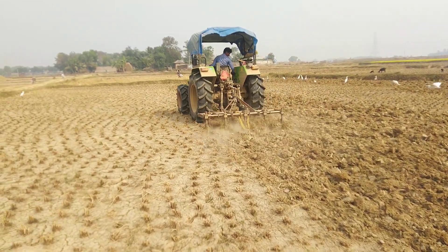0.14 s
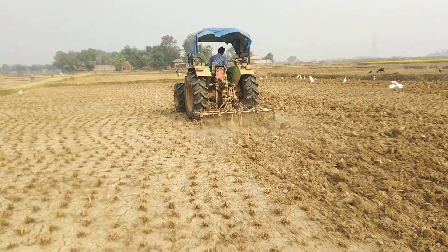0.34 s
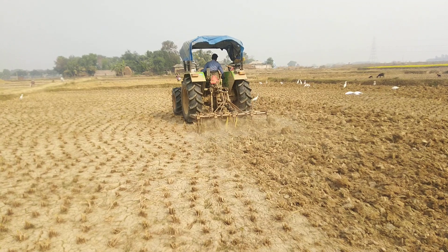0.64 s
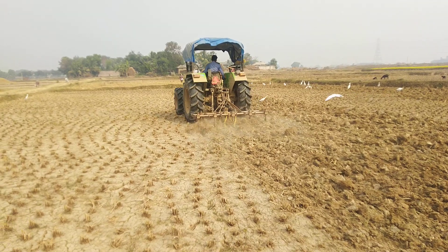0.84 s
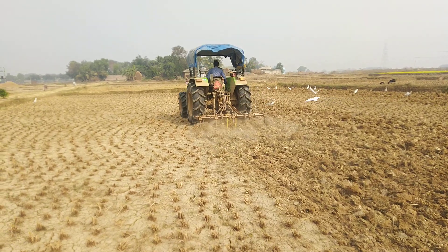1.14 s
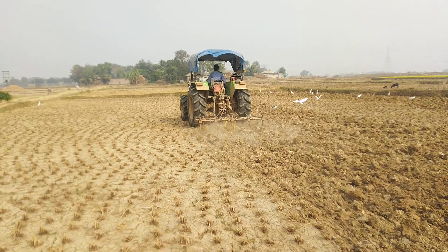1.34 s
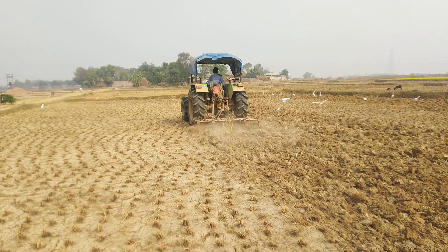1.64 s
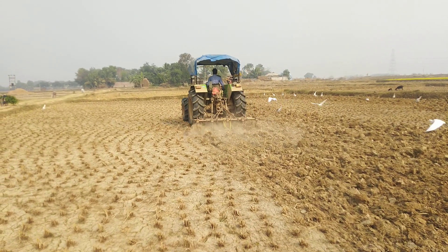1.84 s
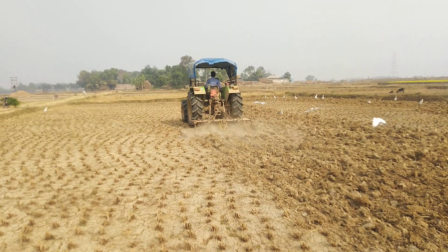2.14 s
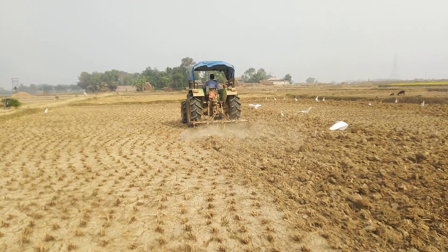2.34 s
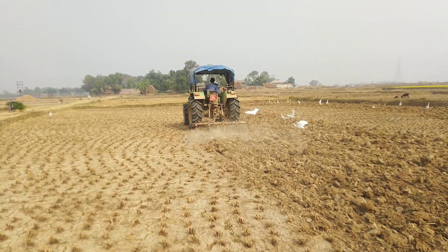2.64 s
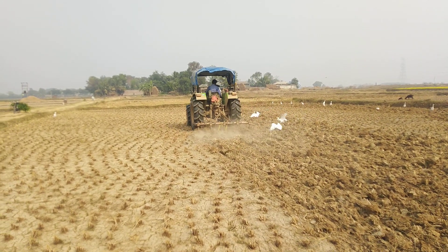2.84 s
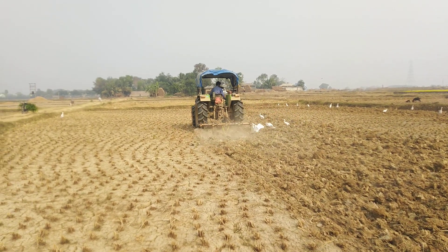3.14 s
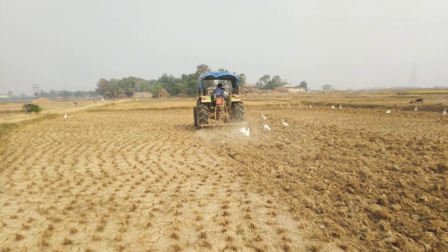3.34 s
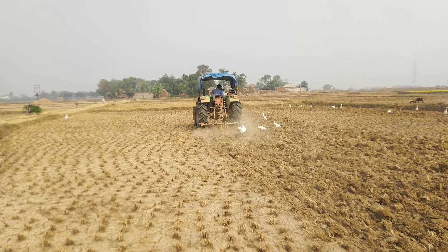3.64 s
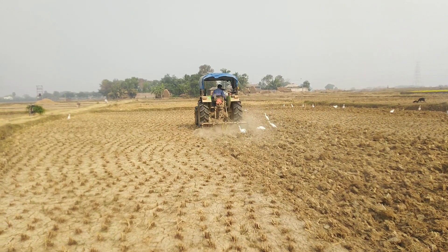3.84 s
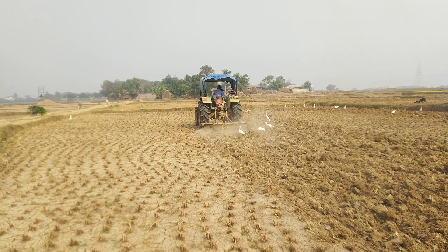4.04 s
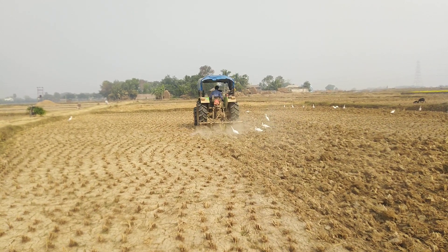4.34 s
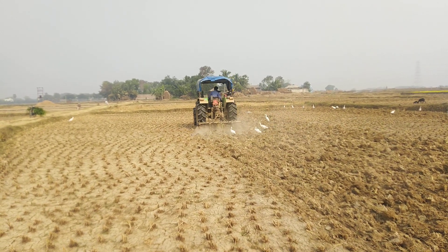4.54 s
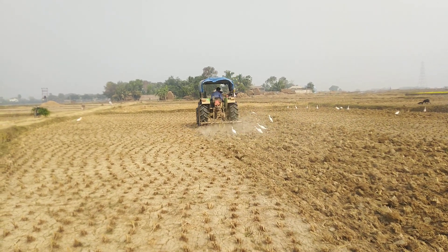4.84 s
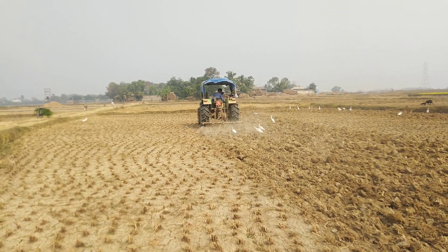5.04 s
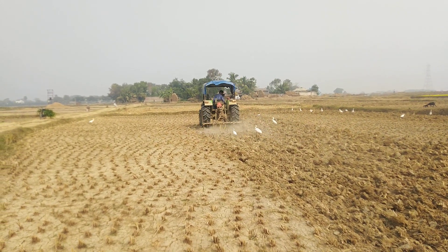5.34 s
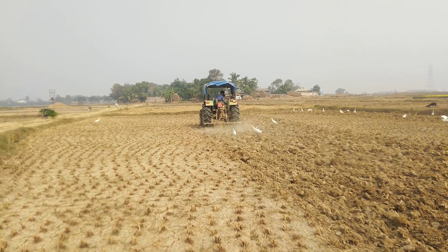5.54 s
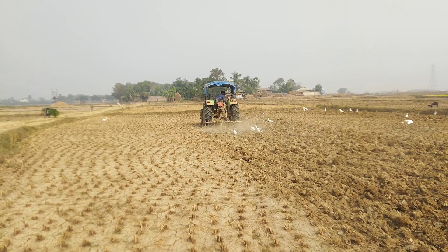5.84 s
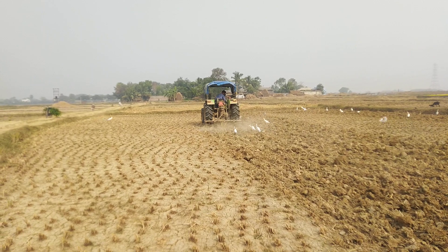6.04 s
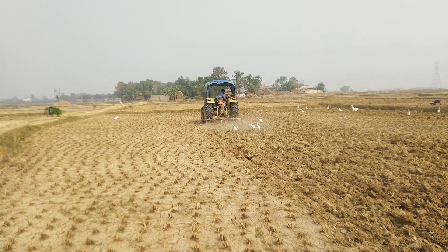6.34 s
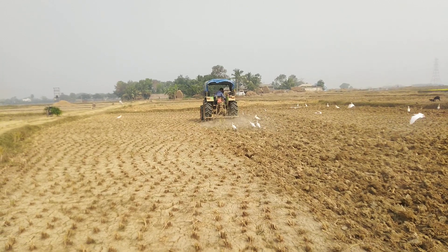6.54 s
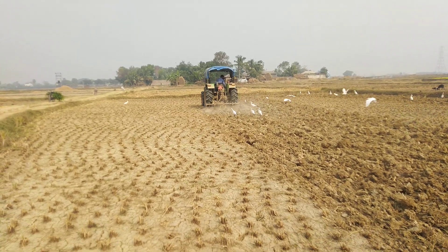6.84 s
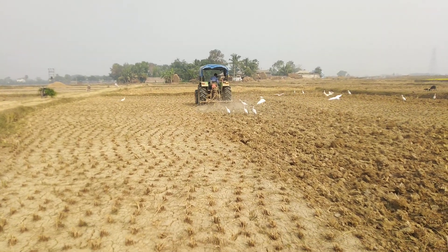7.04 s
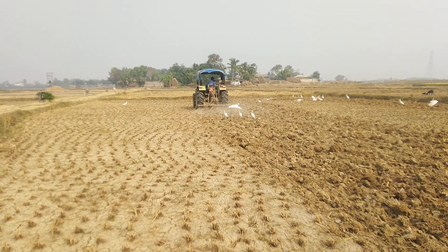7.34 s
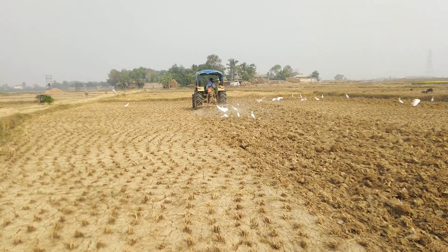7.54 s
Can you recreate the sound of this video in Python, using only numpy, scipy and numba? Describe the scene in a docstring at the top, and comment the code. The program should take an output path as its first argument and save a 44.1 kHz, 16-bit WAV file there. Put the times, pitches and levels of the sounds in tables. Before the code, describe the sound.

Steady diesel clatter with knocking steel and wavering gear whine recedes over dry soil, broken by one hard pop and thumping wind on the right.

```python
"""A diesel engine's throb, clatter and gear whine come first: a tractor drags a cultivator away, about 8 to 31 m off.
The governor hunts with the load, so exhaust orders, whine and combustion bursts follow one shaft speed; slack steel
knocks as damped modes. Clods crumble as noise showers, and small birds chirp as rising near-sines. Gusts of shaped
noise buffet the right microphone; a hard pop makes the limiter duck and a light tick follows later."""
import sys
import numpy as np
from scipy import signal
from scipy.fft import rfft, irfft
from scipy.io import wavfile
from scipy.ndimage import uniform_filter1d
from numba import njit

SR = 44100
rng = np.random.default_rng(int(sys.argv[2]) if len(sys.argv) > 2 else 0)


def store_pcm(level_fs):
    """Save levels as 16-bit WAV."""
    pcm = np.round(np.clip(level_fs, -1, 1) * 32767).astype(np.int16)
    wavfile.write(sys.argv[1], SR, np.atleast_2d(pcm).T)


N = 338688
T = np.arange(N) / SR  # s
FREQ = np.maximum(np.arange(N // 2 + 1) * SR / N, 1)  # Hz, kept above 0 for logarithms


def undb(db):
    """Logarithmic level: decibels to amplitude gain."""
    return 10 ** (np.asarray(db) / 20)


def unit(x):
    """Power normalisation: scale to rms 1."""
    return x / np.sqrt(np.mean(x ** 2))


def curves(table):
    """Linear interpolation in time: each column of (t, ..) rows, sample by sample."""
    t, *columns = np.transpose(table)
    return [np.interp(T, t, column) for column in columns]


def spectra(table):
    """Interpolation over log frequency: each column of (f, ..) rows, bin by bin."""
    hz, *columns = np.transpose(table)
    return [np.interp(np.log(FREQ), np.log(hz), column) for column in columns]


def colour(x, table):
    """Linear filtering: weight the spectrum by a table, then scale to rms 1."""
    return unit(irfft(rfft(x) * undb(spectra(table)[0]), N))


def noise():
    """White noise: independent Gaussian samples."""
    return rng.standard_normal(N)


def walk(rate):
    """Low-pass noise: a smooth random course of rms 1 that changes about rate times a second."""
    return unit(irfft(rfft(noise()) * np.exp(-(FREQ / rate) ** 2), N))


def pan(x, db):
    """Interchannel level difference: left minus right, in dB, places the sound."""
    return x * undb(np.array([[db], [-db]]) / 2)


def taps(table):
    """Impulsive excitation: one impulse for each (t/s, level/dB) row."""
    out = np.zeros(N)
    for t, db in table:
        out[int(t * SR)] += undb(db)
    return out


def ringing(modes):
    """Modal decay: one blow on (f/Hz, level/dB, t60/s) modes gives damped sines, scaled to peak 1."""
    t = T[:SR // 8]
    body = np.zeros(len(t))
    for k, (hz, db, t60) in enumerate(modes):
        decay = np.exp(-np.log(1000) * t / t60)
        body += (-1) ** k * undb(db) * np.sin(2 * np.pi * hz * t) * decay
    return body / np.abs(body).max()


def ring(x, modes):
    """Convolution: each impulse sets off the modal decay."""
    return signal.fftconvolve(x, ringing(modes))[:N]


def steady(x, window_s):
    """Running rms normalisation: even out swells of a noise that last longer than a window."""
    return x / np.sqrt(uniform_filter1d(x ** 2, max(int(window_s * SR), 2)) + 1e-9)


def gust(start, held, release_s, attack_s=0.035):
    """Exponential envelope: a gust swells quickly, holds and dies away."""
    swell = np.minimum(T - start, 0) / attack_s
    fall = np.maximum(T - start - held, 0) / release_s
    return np.exp(swell - fall)


# sharp thumps of wind on the right microphone: (t/s, dip level/dB, width/ms)
BUFFETS = [(1.948, -10.5, 1.5), (2.166, -8.5, 1.45), (3.030, -11, 1.24), (3.195, -11, 1.2),
           (3.598, -13, .6), (3.632, -12, 3.1), (3.74, -6.5, 0.93), (3.853, -11.5, .45),
           (3.867, -13.5, 0.83), (3.959, -16, 1.2), (4.053, -6, 1.3), (4.198, -7.5, 0.86), (4.248, -9, 1.6),
           (4.262, -13, 0.41), (4.635, -10.5, 1.27), (5.461, -18, 0.93), (6.195, -8.5, 2), (6.236, -17, .8),
           (6.546, -19, 0.94), (6.689, -14, 1.3), (6.744, -17, 0.86)]


def buffets():
    """Vortex shedding: an eddy breaks off the port, a sharp pressure dip with a rebound on each side."""
    out = np.zeros(N)
    for t, db, width_ms in BUFFETS:
        u = (T - t) * 1000 / width_ms
        near = np.abs(u) < 6
        out[near] += undb(db) * (u[near] ** 2 - 1) * np.exp(-u[near] ** 2 / 2)
    return out


# low wind noise, relative spectral density: (f/Hz, level/dB)
RUMBLE_SPECTRUM = [(18, -56), (32, -30), (45, -10.5), (70, 0), (120, -2.5), (200, -12), (280, -21),
                   (450, -35.5), (900, -90.5)]
# brighter wind noise, relative spectral density: (f/Hz, level/dB)
RUSH_SPECTRUM = [(80, -36.5), (170, 3), (280, -1), (400, -8.5), (550, -14), (900, -32), (2000, -58),
                 (4000, -84)]
# breeze between gusts: (t/s, right rumble level/dB, sheltered left rumble level/dB), before random sway
BREEZE = [(0, -54, -42.5), (.9, -35, -32.5), (1.5, -30, -45), (2.1, -30, -40), (2.6, -33, -41.5),
          (3.4, -33, -45.5), (4.5, -29, -41), (5.2, -28.5, -50), (5.9, -28.5, -48), (6.6, -25, -54),
          (7.15, -35.5, -37), (7.68, -23, -34)]
# gusts on the right microphone: (start t/s, held t/s, rumble level/dB, rush level/dB)
GUSTS = [(.58, 0.051, -25, -49), (.67, 0.016, -19, -36), (.85, 0.086, -24, -34.5),
         (1.194, 0.081, -20, -28.5), (1.53, .33, -23.5, -38.5), (1.931, .062, -19, -27),
         (2.16, 0.024, -25.5, -35), (2.34, 0.053, -33, -32.5), (2.70, 0.11, -26.5, -31),
         (2.86, 0.15, -21, -32.5), (3.0, 0.1, -18, -31.5), (3.13, 0.058, -18.5, -28),
         (3.559, .2, -19.5, -23), (3.595, 0.0094, -23, -16), (3.85, 0.019, -19.5, -18),
         (3.89, 0.038, -18.5, -23), (3.96, .06, -18.5, -25.5), (4.05, 0.17, -21, -25.5),
         (4.19, 0.084, -20.5, -22.5), (4.325, 0.0073, -25, -25.5), (4.60, 0.092, -24.5, -37.5),
         (4.78, 0.014, -18, -41), (4.88, 0.12, -24, -49), (5.345, .09, -18, -38), (5.48, .21, -20.5, -32),
         (6.31, 0.11, -20, -33), (6.48, 0.11, -19.5, -26), (6.64, .06, -32, -30.5), (7.48, .2, -27, -30.5)]


def wind(eddy_db=2.15, burst_db=4.5, breeze_sway_db=0.7, breeze_rush_db=-15.5):
    """Turbulent pressure: eddies press on each port separately, and gusts rise from the breeze."""
    right_db, left_db = curves(BREEZE)
    rumble = undb(right_db + breeze_sway_db * walk(5.1))
    rush = undb(breeze_rush_db) * rumble
    # the bright rush of a gust stops sooner than its rumble
    for start, held, rumble_db, rush_db in GUSTS:
        rumble = np.maximum(rumble, undb(rumble_db) * gust(start, held, release_s=0.036))
        rush = np.maximum(rush, undb(rush_db) * gust(start, held, release_s=0.031))
    dense = steady(colour(noise(), RUMBLE_SPECTRUM), window_s=0.054)
    ragged = steady(colour(noise() * undb(burst_db * walk(56)), RUSH_SPECTRUM), window_s=.04)
    right = rumble * unit(dense * undb(eddy_db * walk(57))) + rush * ragged + buffets()
    left = undb(left_db + breeze_sway_db * walk(2.5)) * colour(noise(), RUMBLE_SPECTRUM)
    return np.array([left, right])


# dry clods crack under the tines: (t/s, starting level/dB before panning)
CLODS = [(.98, -59), (2.12, -52), (3.35, -50), (4.55, -54), (4.75, -58), (6.81, -57), (6.86, -57)]


def soil(crumble_s=0.013, grain_db=2.0, crumbs_db=-72):
    """Granular noise: clods burst into decaying showers of grains over a steady trickle of crumbs."""
    showers = signal.lfilter([1], [1, -np.exp(-1 / (crumble_s * SR))], taps(CLODS))
    # relative spectral density: (f/Hz, level/dB)
    spectrum = [(1500, 4.5), (4500, 5.5), (8000, -16.5), (10500, -7.5), (15000, -27.0)]
    grains = colour(noise() * undb(grain_db * rng.exponential(size=N)), spectrum)
    trickle = undb(crumbs_db + 2 * walk(11))
    return pan(grains * (showers + trickle), db=7.0)


# rising chirps: (t/s, length/s, start f/Hz, end f/Hz, arch, level/dB before flutter and panning)
# arch: below 0 the sweep steepens, above 0 it levels off; a slight waver moves the pitch
CHIRPS = [(1.81, .05, 2830, 3250, -.6, -55), (2.212, .088, 2680, 3380, -.8, -48),
          (2.529, .032, 3040, 4150, -.55, -49.5), (2.588, .028, 3200, 3900, -.3, -57),
          (3.047, .047, 2750, 3150, -.4, -52), (3.609, .043, 2950, 3480, 1.4, -49.5),
          (7.423, .053, 4250, 4650, 0, -67)]


def birds(waver=.003, flutter_db=3.5):
    """Frequency modulation: each chirp is a near sine that sweeps upward and trembles a little."""
    out = np.zeros(N)
    pitch, size = 1 + waver * walk(150), undb(flutter_db * walk(120))
    for t, length, start_hz, end_hz, arch, db in CHIRPS:
        u = np.linspace(0, 1, int(length * SR))
        span = slice(int(t * SR), int(t * SR) + len(u))
        sweep = u + arch * u * (1 - u)
        hz = (start_hz + (end_hz - start_hz) * sweep) * pitch[span]
        envelope = undb(db) * size[span] * np.sqrt(np.abs(np.sin(np.pi * u)))
        out[span] += envelope * np.sin(2 * np.pi * np.cumsum(hz) / SR)
    return pan(out, db=4)


# modes of the light tick: (f/Hz, relative level/dB, t60/s)
TICK_MODES = [(1400, 7, .005), (2760, 8, 0.0024), (3770, 10, 0.0047), (4290, 8, 0.0091), (6100, -3, .0031),
              (11800, -1, 0.0023), (14600, -12, .003)]


def microphone_clicks(pop_s=1.276, pop_db=13, pop_fall_s=.03, bass_cut_hz=48, tick_s=6.7617, tick_db=-23.0,
                      snap_db=-3, snap_lead_s=0.00015, snap_gap_s=.00009, snap_width_s=.000025):
    """Impulse response: a hard pop rings the left bass filter; later a light tick falls mostly on the right."""
    # a pressure jolt that leaks off
    jolt = uniform_filter1d(-np.exp(-np.abs(T - pop_s) / pop_fall_s) * (T >= pop_s), size=5)
    bass_cut = signal.butter(N=6, Wn=bass_cut_hz, btype="high", fs=SR, output="sos")

    def snap(lead_s):
        """Gaussian pulse: a very short snap ahead of the jolt."""
        return np.exp(-((T - pop_s + lead_s) / snap_width_s) ** 2)

    double_snap = snap(snap_lead_s) + snap(snap_lead_s + snap_gap_s) / 2
    pop = undb(pop_db) * signal.sosfilt(bass_cut, jolt) + undb(snap_db) * double_snap
    tick = ring(taps([(tick_s, tick_db)]), TICK_MODES)
    return np.array([pop, np.zeros(N)]) + pan(tick, db=-12)


def receding(start_db, loss_db, start_m=7.64, away_m_s=3.05):
    """Distance law: level in dB falls by loss_db per doubling as the tractor draws away steadily."""
    return start_db - loss_db * np.log2(1 + away_m_s * T / start_m)


# how the tractor sits between the microphones: (f/Hz, left minus right level/dB, side share level/dB)
STEREO = [(63.6, -1, 0), (300, -2, -20), (770, 2, -34), (1300, 5.5, -7.5), (2150, -1.5, 10),
          (2960, 5, -9.5), (4430, 11.5, -5), (5570, 7, 0.5), (9000, 0.5, 0.5)]


def field(direct, scattered, echo_s=0.001409, echo=0.28, lag_s=.0001):
    """Comb filtering and arrival lag: one early reflection, left later than right, scattered sound on the side."""
    pan_db, side_db = spectra(STEREO)
    comb = 1 + echo * np.exp(-2j * np.pi * FREQ * echo_s)
    mid, side = rfft(direct), rfft(scattered) * undb(side_db)
    left = (mid + side) * undb(pan_db / 2) * np.exp(-2j * np.pi * FREQ * lag_s)
    right = (mid - side) * undb(-pan_db / 2)
    return irfft(np.array([left, right]) * comb / np.sqrt(1 + undb(2 * side_db)), N)


# level change of the 1.7-3.5 kHz band: (t/s, level/dB)
TREBLE_LEVEL = [(0, 0.5), (.2, 2.5), (.4, 1.5), (1.2, 0), (2.6, 1), (3.5, 0.5), (5.25, 1.5), (5.6, -0.5),
                (5.7, 3), (6.2, 3), (7.68, -1)]


def treble_swell(x):
    """Time-varying band gain: the upper clatter grows brighter and duller."""
    band_pass = signal.butter(2, [1700, 3500], "band", fs=SR, output="sos")
    band = signal.sosfiltfilt(band_pass, x)
    return x + (undb(curves(TREBLE_LEVEL)[0]) - 1) * band


def rattle(turns, scatter_db=4):
    """Periodic impact: loose steel taps lightly on each crank turn, with random strength."""
    return np.diff(np.floor(turns), prepend=0) * undb(scatter_db * np.clip(noise(), -2, 1.5))


# modes of the slack steel: (f/Hz, relative level/dB, t60/s)
KNOCK_MODES = [(1172, -1.5, 0.057), (1302, 2.5, 0.025), (1540, 5.5, 0.012), (1546, -0.5, 0.025)]
# knocks that stand out: (t/s, level/dB, tilt: top mode against the lowest level/dB)
# the level is the peak of the untilted blow scale, before the stereo field
HARD_KNOCKS = [(0.122, -27.5, -7), (0.207, -25, -8), (0.301, -22, -14), (0.385, -21, -7), (.473, -33, 1),
               (.560, -29, 4), (0.647, -26, 9), (0.74, -27.5, -7), (0.832, -27, -8), (1.108, -24, 12),
               (1.197, -23.5, -4), (1.477, -25, -5), (1.748, -28, -3), (1.843, -27, -3), (1.936, -21.5, 9),
               (2.210, -20.5, 6), (2.295, -23, -2), (2.474, -27, -2), (2.562, -21.5, 0), (2.743, -34, -9),
               (2.834, -25.5, 6.5), (3.286, -26.5, 0), (3.554, -25.5, 2), (3.643, -33.5, 4),
               (3.922, -29, -3), (4.103, -27, 1.5), (4.193, -26, 5), (4.286, -27, -7), (4.376, -28, 6.5),
               (4.648, -23.5, 7), (4.736, -26, -0.5), (4.828, -28.5, -6), (5.008, -26, 0),
               (5.097, -28.5, 8), (5.188, -29, 6), (5.282, -30.5, -3), (5.555, -26, 4), (5.64, -35, 0),
               (5.73, -30, -11), (6.092, -29, 14), (6.371, -27, 6.5), (6.463, -31, 12.5), (6.988, -30, -10),
               (7.18, -31.5, -8), (7.370, -26, -1), (7.461, -33, 2)]


def knocking(clatter_db, beat_s=.091, light_db=0.0, scatter_db=3.0):
    """Impact excitation of modes: hard blows, each with its own colour, and light ones on the beat between."""
    blows = list(HARD_KNOCKS)
    for (t, _, _), (later, _, _) in zip(HARD_KNOCKS, HARD_KNOCKS[1:]):
        for beat in np.linspace(t, later, round((later - t) / beat_s) + 1)[1:-1]:
            db = clatter_db[int(beat * SR)] + light_db + scatter_db * rng.standard_normal()
            blows.append((beat, db, 0))
    out = np.zeros(N)
    for t, db, bright_db in blows:
        tilt = np.linspace(0, bright_db, len(KNOCK_MODES))
        modes = [(hz, mode_db + lift, t60) for (hz, mode_db, t60), lift in zip(KNOCK_MODES, tilt)]
        blow = ringing(modes)
        out[int(t * SR):int(t * SR) + len(blow)] += undb(db) * blow
    return out


def whine(turns, teeth=22, flutter_db=2.0, slip=0.26, wander=0.94, octave_db=-18, sway=0.1):
    """Gear meshing: teeth sing; backlash shakes the phase (rad) and the shaft sways the level once a turn."""
    mesh = 2 * np.pi * teeth * turns + slip * walk(60) + wander * walk(8.1)
    octave = undb(octave_db + 5.3 * walk(3.4)) * np.sin(2 * mesh)
    tone = np.sin(mesh) + octave
    return unit(tone * undb(flutter_db * walk(11)) * (1 + sway * np.sin(2 * np.pi * turns)))


def orders(turns, table, wobble_db, wobble_rate):
    """Harmonic synthesis: lines on multiples of the crank rate, unsteady because no two firings are equal."""
    lines = np.zeros(N)
    for multiple, db in table:
        line = np.sin(2 * np.pi * (multiple * turns + rng.random()))
        lines += undb(db + wobble_db * walk(wobble_rate)) * line
    return unit(lines)


# panels and castings that colour the clatter: (f/Hz, width f/Hz, lift level/dB)
PANELS = [(670, 210, 2), (912, 75, 2.5), (1440, 45, 2.5), (1862, 150, 10.5), (2200, 40, 4),
          (2700, 270, 1.5)]


def combustion(turns, table, depth, repeat, fall=0.87, scatter_db=6, uneven_db=0.3):
    """Amplitude-modulated noise: two firings a turn shake the block; strong and weak ones alternate."""
    firing = (2 * turns).astype(int)
    scatter = np.clip(rng.standard_normal(1024), -2, 2)[firing]
    size = undb(scatter_db * scatter + uneven_db * (-1) ** firing)
    # the same parts strike in the same order in every two-turn cycle: this share draws faint lines
    pattern = rng.standard_normal(size=2640)
    place = (turns / 2 % 1 * len(pattern)).astype(int)
    share = np.clip(repeat, 0, 1)
    shake = np.sqrt(share) * pattern[place] + np.sqrt(1 - share) * noise()
    # fall is in firing intervals
    bursts = shake * (1 + depth * size * np.exp(-(2 * turns % 1) / fall))
    lift_db = sum(db / (1 + (2 * (FREQ - hz) / width) ** 2) for hz, width, db in PANELS)
    return colour(irfft(rfft(bursts) * undb(lift_db), N), table)


# clatter and hiss before the panels' lift, relative spectral density: (f/Hz, level/dB)
CLATTER_SPECTRUM = [(25, -17.5), (55, -1), (140, -6), (290, 1.5), (470, -8.5), (620, -2), (780, 3.5),
                    (1030, -7), (1400, 0), (1580, -4.5), (1800, -16), (2650, -10.5), (3300, -28.5),
                    (5000, -54.5)]
HISS_SPECTRUM = [(1800, -28.5), (3200, 6.5), (4400, -1.5), (5700, -8), (6800, -17.5), (8000, -30),
                 (9600, -15), (12300, -15), (14000, -31.5), (16000, -41.5)]


def block_noise(turns, clatter_db, hiss_db):
    """Broadband radiation: combustion clatter and its hiss, with fresh random draws at each call."""
    clatter = undb(clatter_db) * combustion(turns, CLATTER_SPECTRUM, depth=0.49, repeat=0.22)
    hiss = undb(hiss_db) * combustion(turns, HISS_SPECTRUM, depth=0.45, repeat=0.089)
    return clatter + hiss


# the hunting governor: the engine races when the tines ease and sags when they bite: (t/s, crankshaft f/Hz)
SPEED = [(0, 32.6), (.15, 33), (.32, 34.75), (.52, 34.35), (.68, 33.6), (.77, 32.8), (1.3, 32.8),
         (1.5, 33.45), (1.75, 32.8), (1.95, 32.7), (2.12, 33.5), (2.27, 34.45), (2.55, 34), (2.88, 33.15),
         (3.05, 33.3), (3.25, 34.2), (3.42, 33.65), (3.65, 33.5), (3.85, 32.85), (4.2, 33.6), (4.42, 32.9),
         (4.68, 33.85), (5.2, 33.4), (5.45, 33), (5.76, 34.6), (6.05, 32.3), (6.2, 32.6), (6.7, 34.6),
         (6.88, 33.95), (7.1, 32.5), (7.45, 33.1), (7.68, 33)]
# gear whine, fading in and out: (t/s, level/dB)
WHINE_LEVEL = [(0, -45), (.25, -46), (.34, -40), (.44, -40), (.56, -34.5), (.77, -41.5), (.87, -38),
               (.94, -35.5), (1.02, -48), (1.11, -34), (1.25, -45), (1.5, -39.5), (1.68, -43),
               (1.85, -39.5), (2.04, -35.5), (2.17, -44), (2.28, -41.5), (2.62, -35.5), (2.73, -38),
               (2.87, -37), (3, -43.5), (3.1, -38.5), (3.25, -36), (3.43, -33), (3.7, -44), (3.97, -37.5),
               (4.15, -42.5), (4.35, -37), (4.5, -34), (4.7, -40), (4.85, -39.5), (4.94, -44.5),
               (5.03, -37), (5.17, -41), (5.28, -40.5), (5.4, -42.5), (5.62, -50), (5.76, -41),
               (5.87, -41.5), (6.07, -51), (6.2, -40), (6.38, -38.5), (6.5, -39.5), (6.6, -55), (6.8, -45),
               (6.95, -39), (7.2, -53.5), (7.36, -52), (7.42, -41.5), (7.68, -41)]
# exhaust lines: (multiple of the crankshaft rate, relative level/dB)
EXHAUST_ORDERS = [(1, -14), (2, 2.5), (3, -2), (3.5, -7.5), (4, -0.5), (4.5, -15.5), (5, -2), (5.5, -9.5),
                  (6, -7.5), (7, -14)]
# block roar beside the whine and around its octave: (multiple of the crankshaft rate, relative level/dB)
BLOCK_ORDERS = [(19, -7.5), (20, -2.5), (21, -2), (23, 0.5), (24, 5.5), (25, -9.5), (26, -6.5), (43, -5.5),
                (44, -11), (45, -1.5)]


def tractor(rattle_db=-5, racing_db_per_hz=0.36):
    """Shaft-locked sources: phase integrated from one crank speed drives throb, roar, whine and clatter."""
    crank_hz = curves(SPEED)[0]
    turns = np.cumsum(crank_hz) / SR
    # clatter and hiss grow as the engine races
    racing_db = racing_db_per_hz * (crank_hz - crank_hz.mean())
    clatter_db = receding(start_db=-32.5, loss_db=4.23) + racing_db
    hiss_db = receding(start_db=-51.5, loss_db=4.43) + racing_db
    block = block_noise(turns, clatter_db, hiss_db)
    scattered = block_noise(turns, clatter_db, hiss_db)
    light_taps = undb(clatter_db + rattle_db) * rattle(turns)
    knocks = knocking(clatter_db) + ring(light_taps, KNOCK_MODES)
    throb = undb(receding(start_db=-32, loss_db=2.75)) * orders(
        turns, EXHAUST_ORDERS, wobble_db=4.5, wobble_rate=19)
    roar = undb(receding(start_db=-42, loss_db=9.8)) * orders(
        turns, BLOCK_ORDERS, wobble_db=6, wobble_rate=13)
    gears = undb(curves(WHINE_LEVEL)[0]) * whine(turns)
    return treble_swell(field(block + throb + roar + gears + knocks, scattered))


def scene():
    """Superposition: wind, field, microphone clicks and the tractor at work add linearly."""
    return wind() + soil() + birds() + microphone_clicks() + tractor()


@njit
def peak_hold(x, release):
    """Envelope following: rise with the level at once and sink slowly."""
    out, level = np.empty(len(x)), 0.
    for i in range(len(x)):
        level = max(x[i], level * release)
        out[i] = level
    return out


def record(dry, release_s=0.096, ceiling=.88, top_hz=15400):
    """Linked peak limiting: both channels turn down on a peak and recover; a low-pass then cuts the top."""
    held = peak_hold(np.abs(dry).max(axis=0), np.exp(-1 / (release_s * SR)))
    limited = dry * ceiling / np.maximum(held, ceiling)
    low_pass = signal.ellip(8, .2, 70, top_hz, fs=SR, output="sos")
    return signal.sosfilt(low_pass, limited)


dry = scene()
out = record(dry)
store_pcm(out)
```